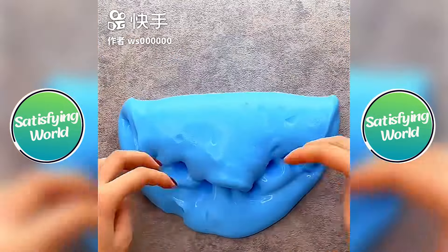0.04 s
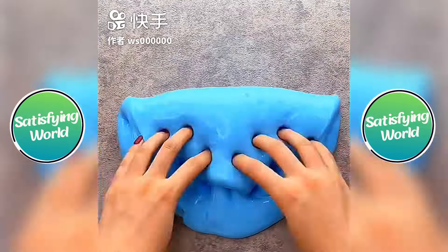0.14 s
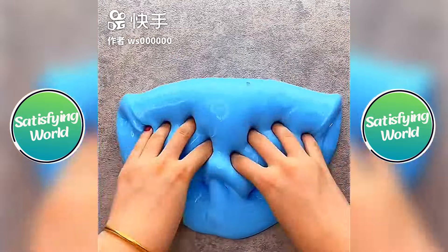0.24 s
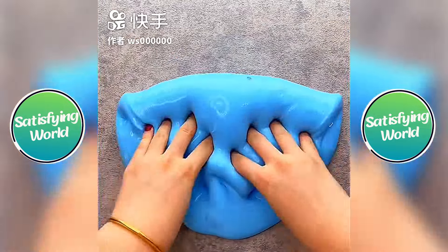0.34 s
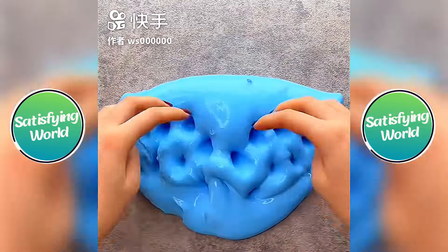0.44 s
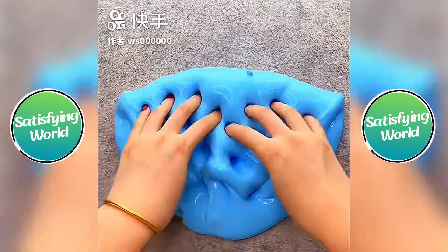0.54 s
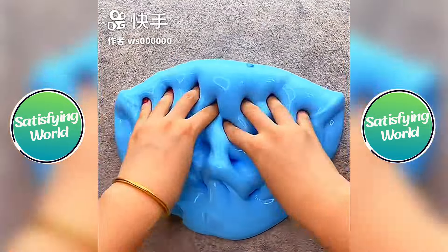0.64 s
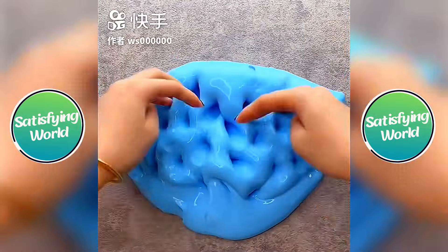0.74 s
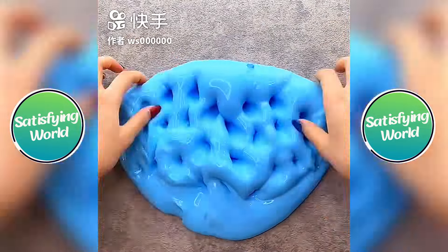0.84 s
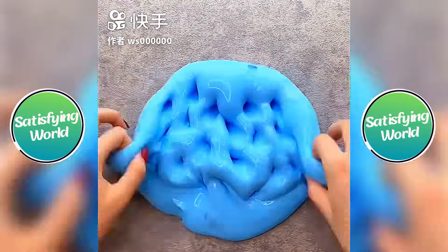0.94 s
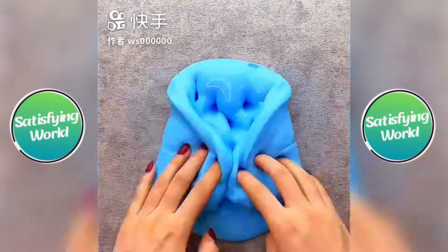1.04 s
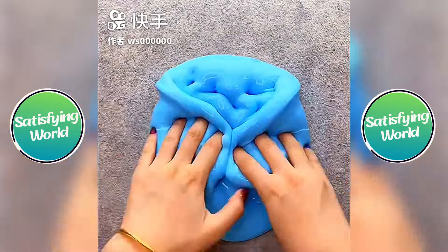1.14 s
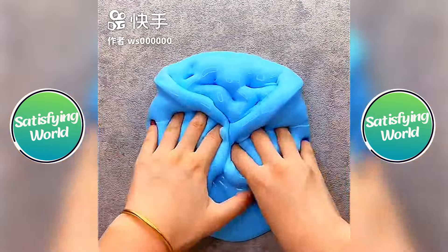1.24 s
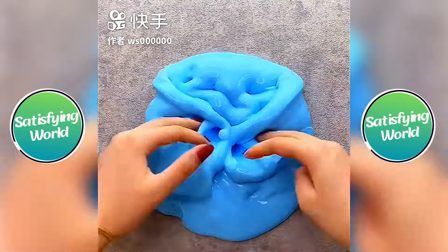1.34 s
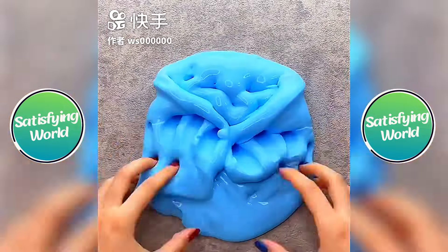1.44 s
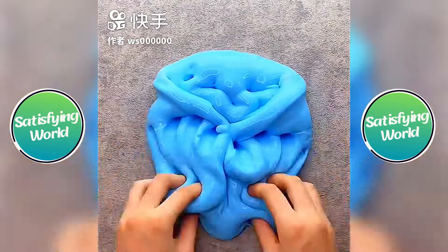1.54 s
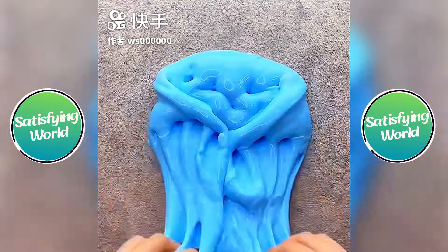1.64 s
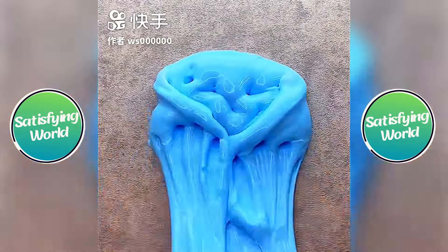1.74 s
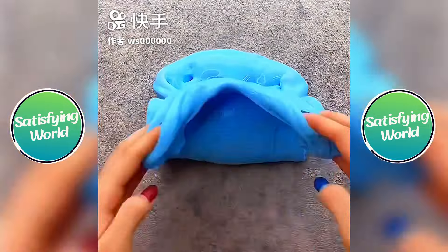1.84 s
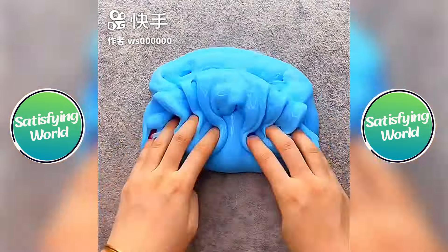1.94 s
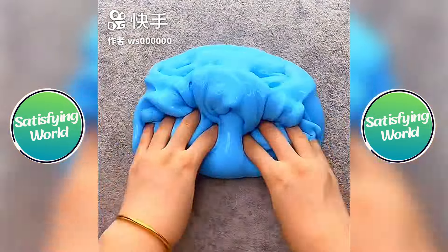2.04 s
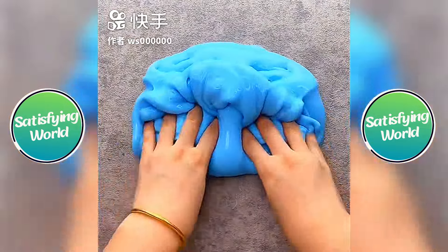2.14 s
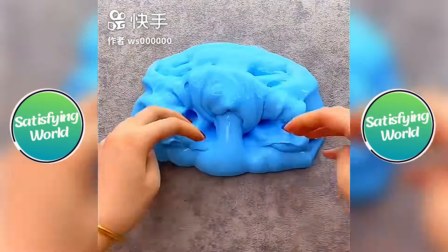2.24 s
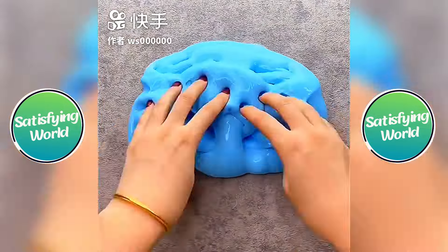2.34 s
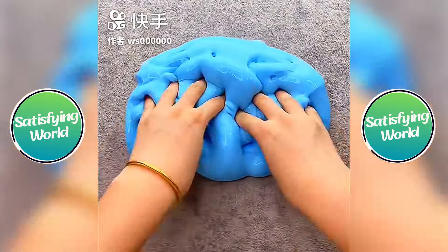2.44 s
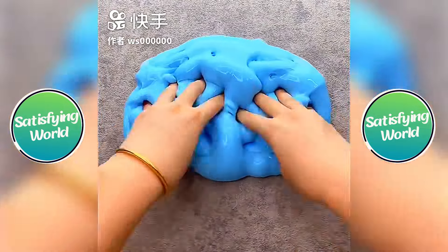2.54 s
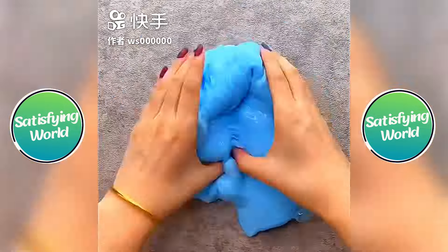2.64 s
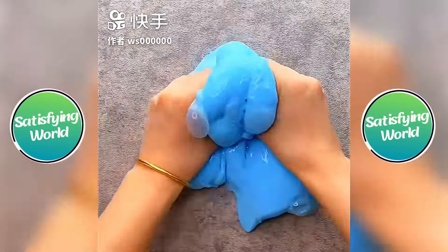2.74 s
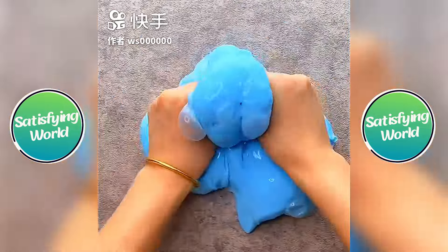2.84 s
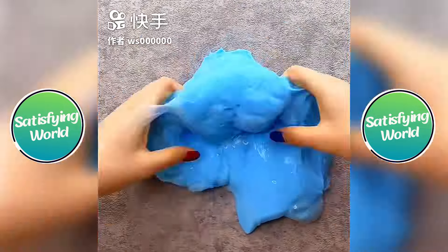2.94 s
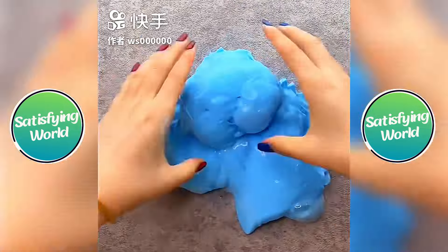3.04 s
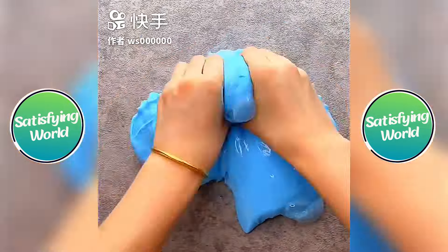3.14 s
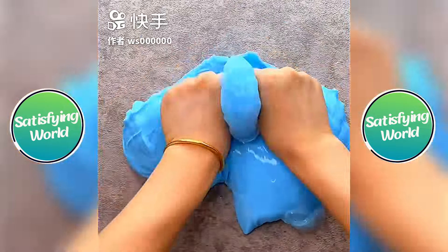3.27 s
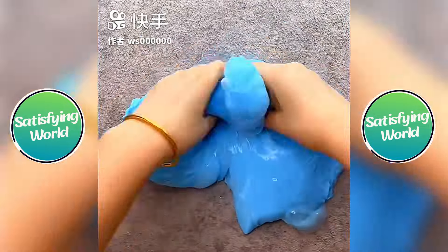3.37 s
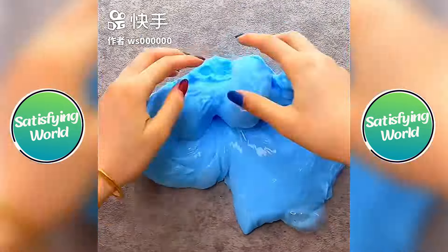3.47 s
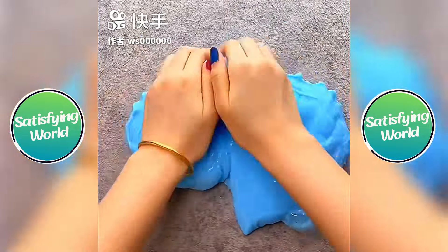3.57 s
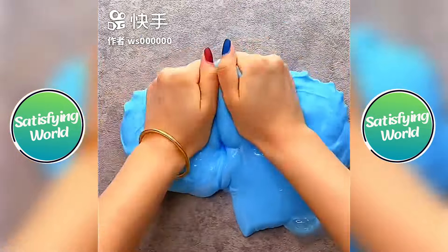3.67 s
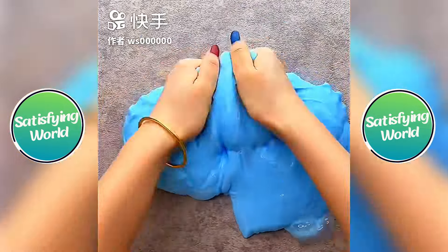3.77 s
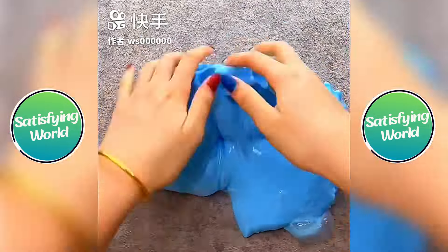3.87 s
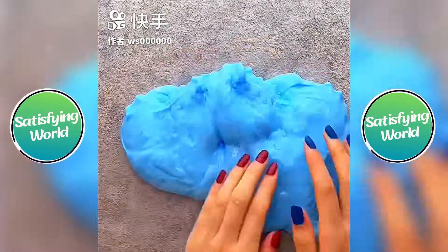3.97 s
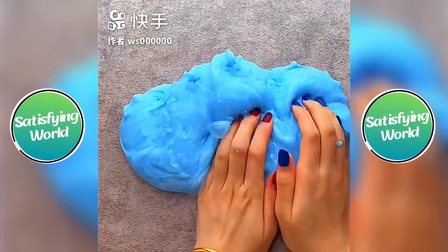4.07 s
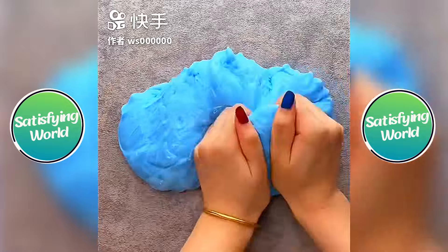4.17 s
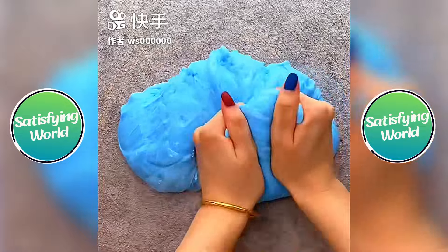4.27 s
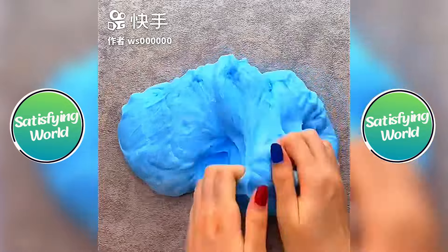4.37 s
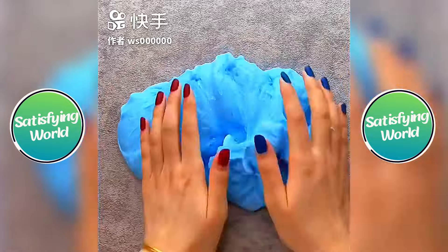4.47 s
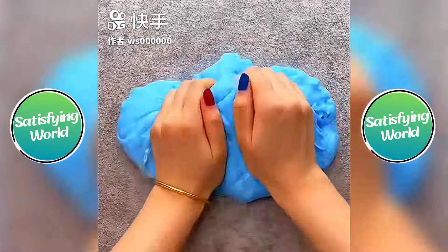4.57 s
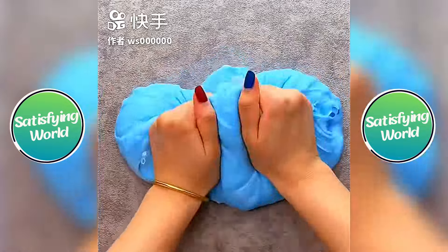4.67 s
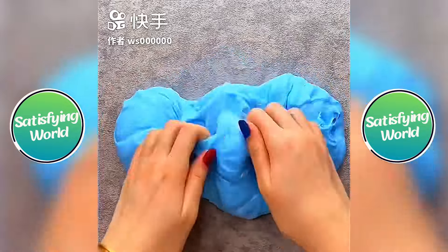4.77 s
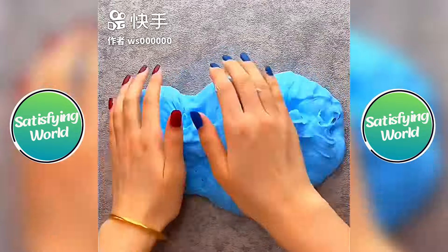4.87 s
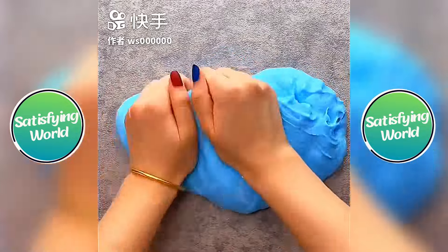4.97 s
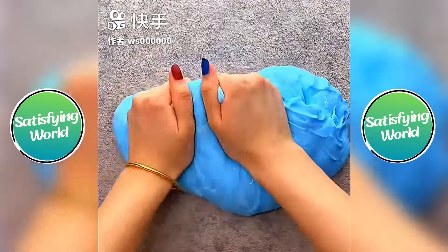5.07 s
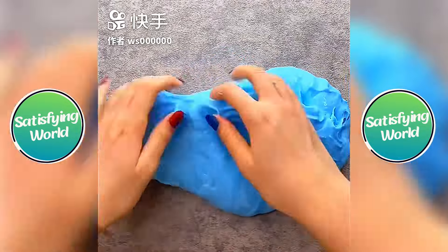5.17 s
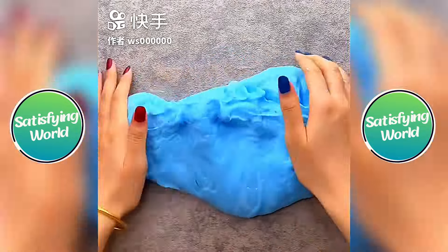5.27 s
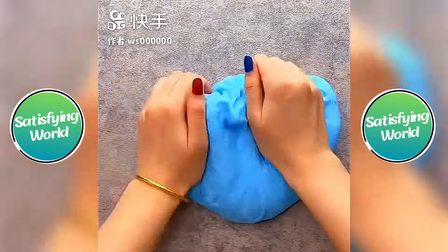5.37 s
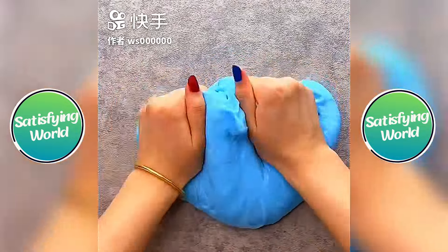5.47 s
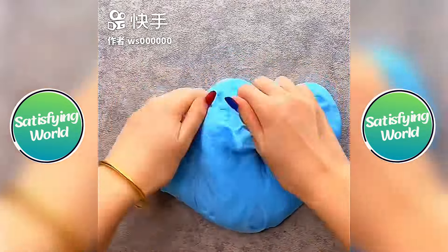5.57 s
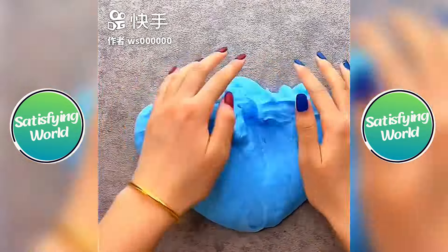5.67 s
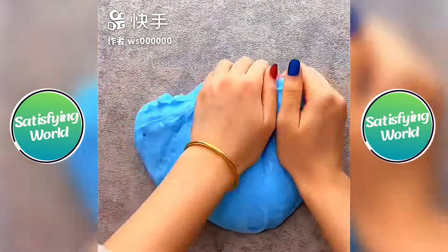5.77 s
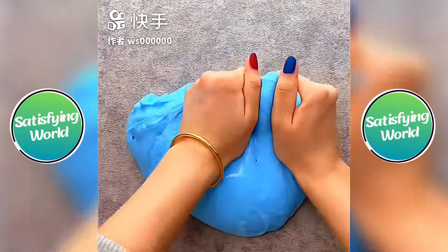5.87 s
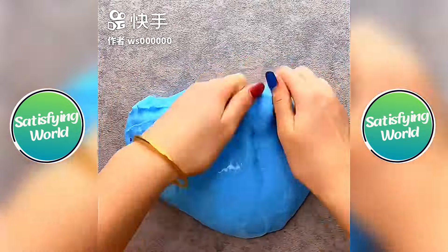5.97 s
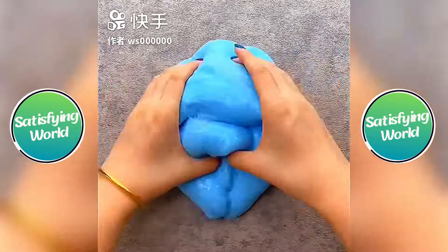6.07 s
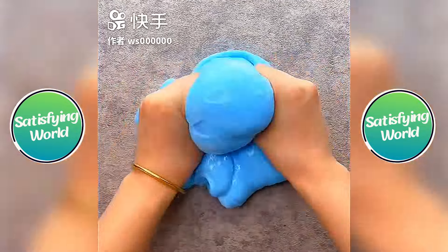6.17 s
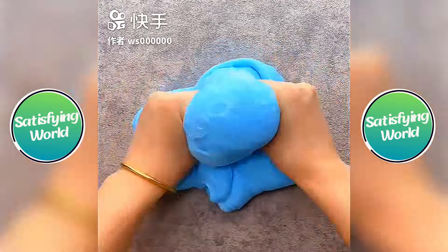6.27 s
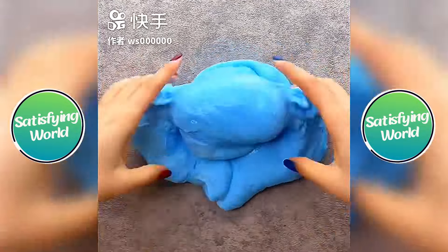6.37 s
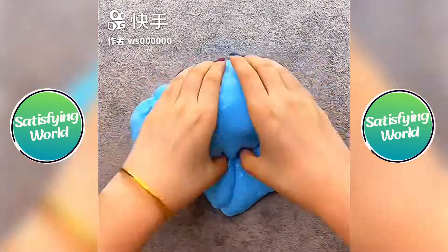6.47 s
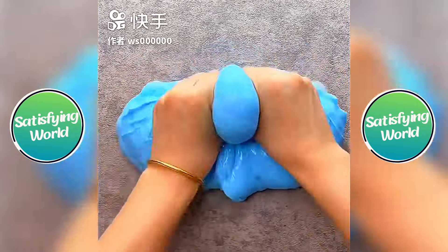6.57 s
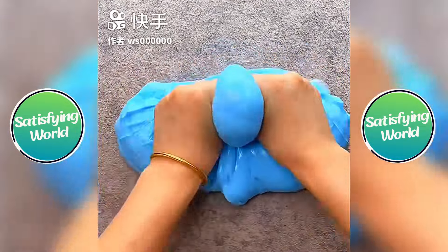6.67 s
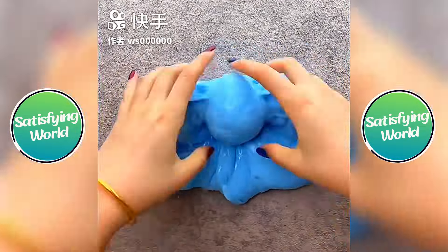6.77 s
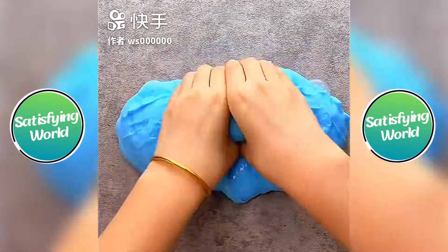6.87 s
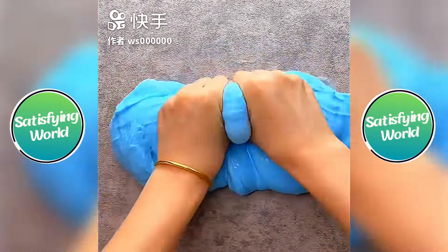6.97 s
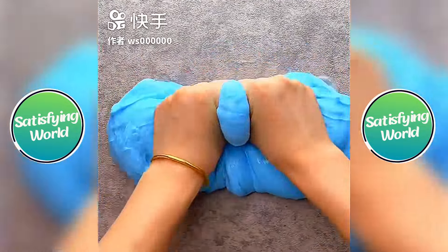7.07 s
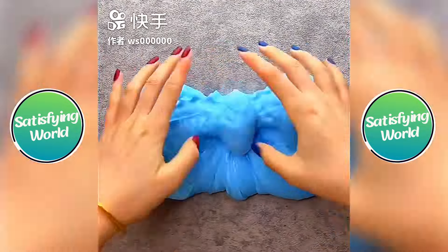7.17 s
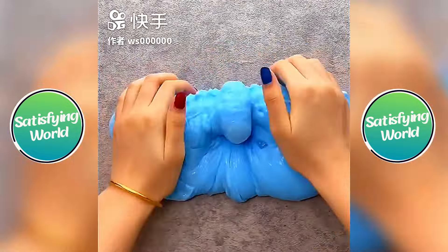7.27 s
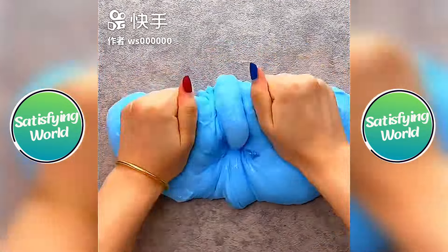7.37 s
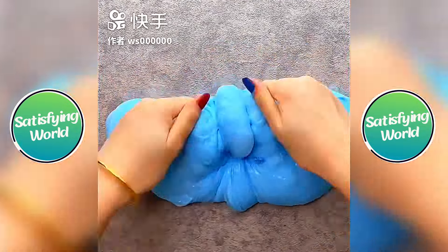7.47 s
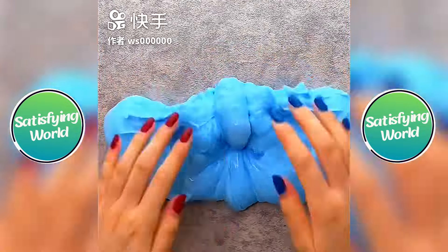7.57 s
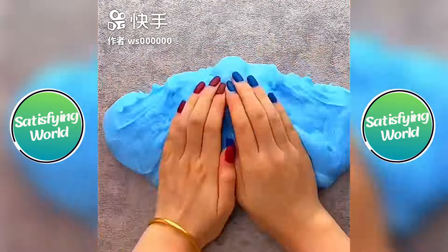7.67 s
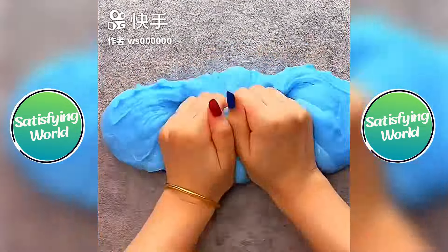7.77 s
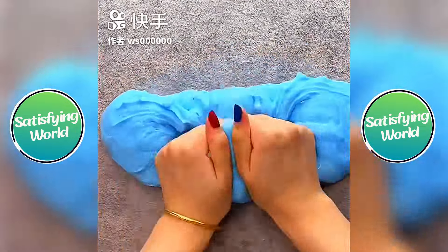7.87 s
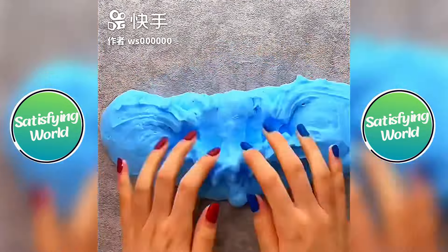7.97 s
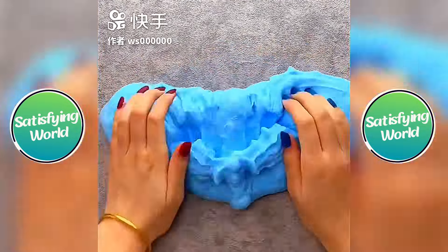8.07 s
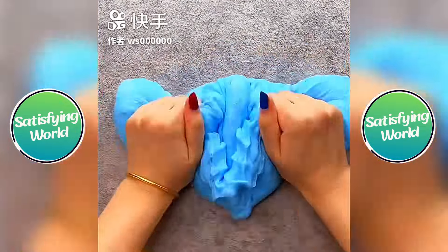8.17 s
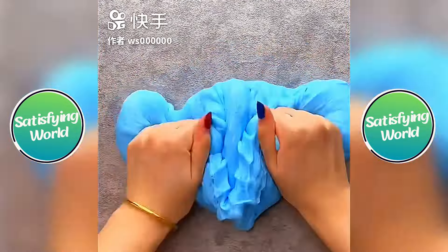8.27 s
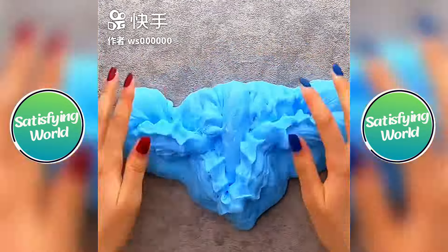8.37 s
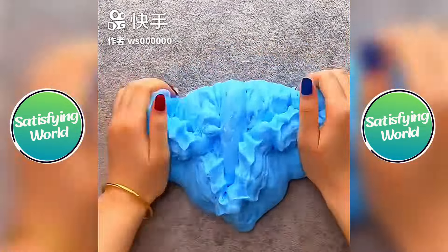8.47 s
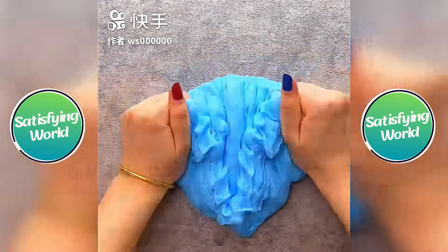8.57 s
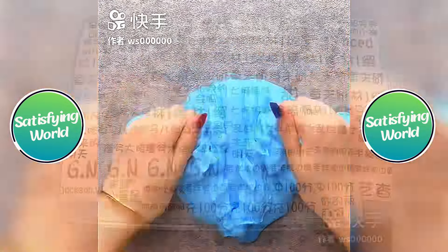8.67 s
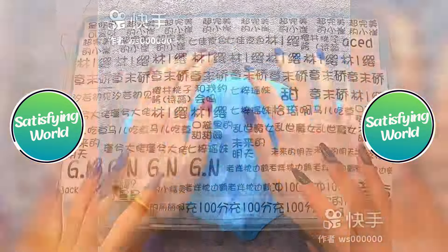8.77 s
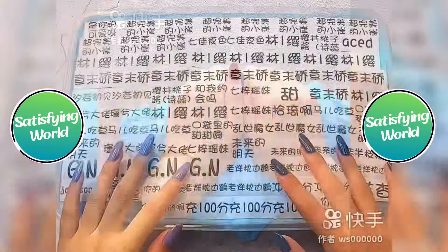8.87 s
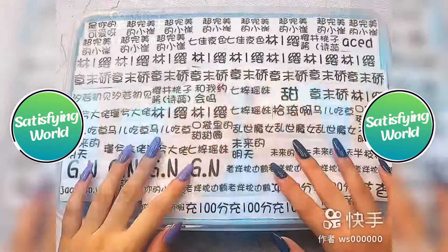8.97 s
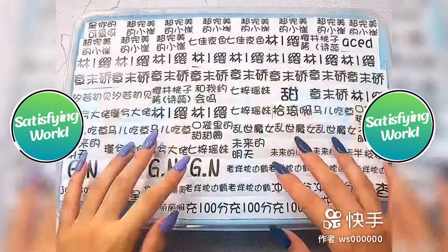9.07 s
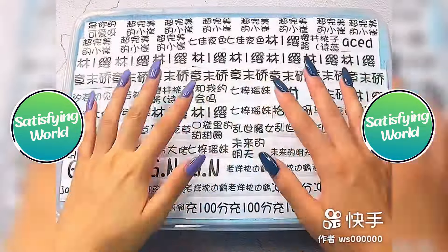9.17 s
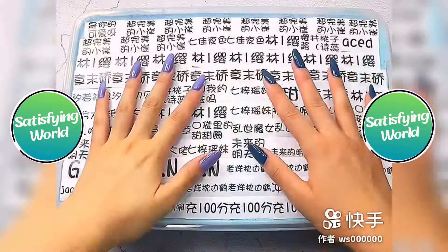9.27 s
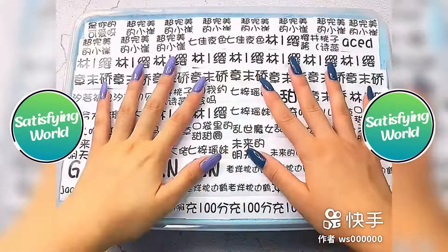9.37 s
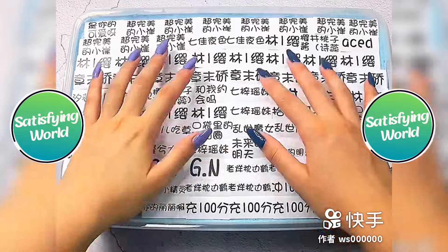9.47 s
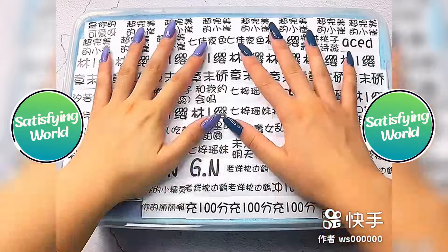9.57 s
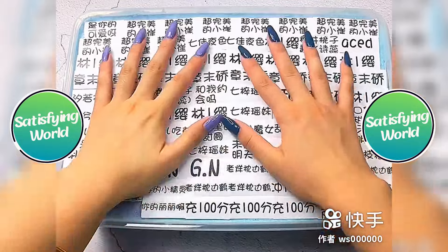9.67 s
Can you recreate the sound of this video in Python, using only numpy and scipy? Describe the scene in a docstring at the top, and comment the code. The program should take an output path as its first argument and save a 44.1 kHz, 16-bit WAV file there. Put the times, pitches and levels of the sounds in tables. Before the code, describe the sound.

Hands poke and knead thick wet slime, with hollow plops, sharp bubble pops and quick bursts of bright crackle ending in sticky peels and gurgles.

```python
"""Hands work a lump of thick slime on a table in a small room, over a faint low hush.
First fingertips poke it: pitched plops of trapped air, short spurts of bubbles, torn pops and a thin squeak.
Then sixteen squeezes follow: ringing bubbles burst in a bright crackle over a wet squish and a low squelch,
and after each one the fingers peel off with a sticky fizz while a sinking gurgle fills the hollow.
Near the end, around the last squeeze and landing, palms rub lightly over slime in a tub: shaped noise."""
import sys
import numpy as np
from scipy import signal
from scipy.fft import rfft, irfft
from scipy.io import wavfile
from scipy.ndimage import uniform_filter1d, minimum_filter1d

SR = 44100
rng = np.random.default_rng(int(sys.argv[2]) if len(sys.argv) > 2 else 0)


def to_wav(sig):
    """Store sig (one row per channel, or 1-D mono) as 16-bit WAV at the path in sys.argv[1].

    Samples outside -1..1 are clipped; the rate is SR.
    """
    pcm = np.clip(np.atleast_2d(sig), -1, 1) * 32767
    pcm = np.round(pcm).astype(np.int16)
    wavfile.write(sys.argv[1], SR, pcm.T)  # frames by channels


N = 428652
TIME = np.arange(N) / SR  # s

# Levels in the event tables are relative: each layer adds its own gain in dB.
# room hush colour: pitch_hz, level_db
HUSH_COLOUR = [(25, -22.5), (70, -25), (140, -3.5), (300, -15), (800, -22), (3000, -35), (16000, -41)]
# room tail, decay by pitch: pitch_hz, t60_s
ROOM_T60 = [(100, .3), (400, .21), (1000, .17), (2100, .17), (4000, .15), (14000, .13)]
# room tail, level by pitch: pitch_hz, level_db
ROOM_LEVELS = [(100, -8), (400, -13), (1000, -14), (2100, -12), (4000, -19.5), (14000, -15.5)]
# palms rubbing lightly over the slime in the tub: time_s, level_db
TUB_RUBS = [(8.72, -53.5), (8.98, -41.5), (9.2, -49), (9.26, -32.5), (9.32, -44), (9.4, -33.5),
            (9.56, -50.5), (9.71, -36.5)]
# colour of the rub: pitch_hz, level_db (per Hz)
RUB_COLOUR = [(50, -11), (160, 11), (400, 8), (1000, 2), (3000, -3.5), (7000, 0.5), (10000, 3.5),
              (16000, -11)]
# fingertips sinking in with a spurt of bubbles: start_s, length_s, level_db, lingering_ring_db
POKES = [(0.0, 0.0056, -26.5, -27), (0.357, 0.031, -21.5, -26.5), (0.71, 0.025, -19.5, -32.5),
         (0.831, 0.016, -34.5, -43.5), (1.013, 0.0028, -36, -42), (1.303, 0.047, -24, -31.5),
         (1.43, 0.035, -32, -43), (2.169, 0.05, -25.5, -34), (2.543, 0.029, -21, -61),
         (8.058, 0.024, -30, -53), (8.407, 0.026, -34, -47)]
# pitches that linger after a poke: pitch_hz, level_db
AFTER_RING_TONES = [(1610, 0.5), (1745, -1.5), (2030, 7.5), (2260, -3.5), (2370, -17.5), (2790, -4)]
# thin squeak of air through a pinhole: time_s, pitch_hz, level_db
SQUEAK_PATH = [(1.735, 1310, -62), (1.77, 1220, -49), (1.805, 1170, -54), (1.825, 1130, -62)]
# hands land and push out a pocket of air: start_s, level_db, pitch_hz, slap_db (relative to the plop)
PLOPS = [(0.002, -20.5, 242.2, -9), (0.361, -6, 375, -3), (0.388, -18, 243.7, -10),
         (0.712, -14.5, 382.2, 4), (0.736, -21, 241.5, -25), (0.829, -5.5, 459, -5),
         (0.847, -13.5, 241.2, -4.5), (0.967, -18, 242.3, -5.5), (1.018, -21, 253, 1),
         (1.308, -13.5, 181.2, -23), (1.43, -11.5, 244.3, -1), (2.177, -6, 201.7, -12),
         (2.198, -4.5, 247.4, -25), (2.544, -10.5, 377.4, -19), (2.565, -21, 234, 12.5),
         (2.681, -17.5, 411, -9), (3.524, -20.5, 433, -1.5), (3.539, -8.5, 227.7, -3),
         (3.841, -17.5, 230.6, -22), (3.975, -5.5, 566, 2), (4.003, -15.5, 535, 6), (4.498, -9, 235.7, -2),
         (5.724, -21, 234, -24), (6.094, -20, 240.5, -13), (6.484, -11.5, 660, 1.5),
         (7.217, -17, 188.2, -0.5), (7.61, -11, 585, 5.5), (8.041, -11, 249, 1.5), (8.412, -14, 244.6, 8.5),
         (8.799, -22, 381.4, -3.5), (9.153, -24.5, 378.5, 0.5)]
# hollow ring of the table under the slime: pitch_hz, level_db, t60_s
TABLE_MODES = [(99.4, -22, 0.26), (158.5, -16, 0.17), (195.3, -12.5, 0.17), (245, -6.5, 0.18),
               (369, -12, 0.15), (542, -13, 0.07), (588, -14.5, 0.099)]
# fingers gather the slime or draw it out: middle_s, half_length_s, squish_db
GRIPS = [(0.933, 0.046, -40), (1.6, 0.025, -39), (1.821, 0.083, -51), (1.993, 0.035, -54.5),
         (3.277, 0.017, -37.5), (4.049, 0.031, -32.5), (5.291, 0.023, -30.5), (5.731, 0.029, -34.5),
         (6.087, 0.029, -31.5), (7.243, 0.013, -28.5), (7.655, .028, -31.5)]
# fists close, then let go:
# start_s, end_s, crackle_db, squish_db, pause_s (until the fingers peel off), peel_db, gurgle_db
SQUEEZES = [(2.696, 2.815, -17, -22, 0.11, -26.5, -28), (3.134, 3.218, -20.5, -27, 0.14, -24.5, -27),
            (3.595, 3.698, -20.5, -23.5, 0.11, -31, -31.5), (4.115, 4.238, -18, -26.5, 0.1, -30, -25.5),
            (4.568, 4.65, -19.5, -26.5, 0.11, -33, -42.5), (4.932, 5.042, -20, -26.5, 0.087, -35.5, -32.5),
            (5.394, 5.453, -18.5, -31.5, 0.11, -34.5, -35), (5.78, 5.878, -21.5, -35.5, 0.05, -41.5, -46),
            (6.154, 6.212, -18, -26.5, 0.093, -25.5, -34), (6.481, 6.604, -18.5, -26, 0.11, -28.5, -30.5),
            (6.9, 7.005, -20, -25.5, 0.099, -33, -37), (7.32, 7.376, -22.5, -33, 0.091, -36.5, -42),
            (7.743, 7.818, -14.5, -24.5, 0.097, -36, -33.5),
            (8.131, 8.196, -24.5, -31, 0.094, -35.5, -33.5), (8.473, 8.555, -23.5, -33.5, 0.12, -39.5, -40),
            (8.864, 8.938, -21, -35, .111, -47, -45)]
# biggest bubbles, and those that burst alone: start_s, snap_db, body_db, body_pitch_hz
POPS = [(0.36, -4.5, -8, 3370), (0.383, -17, -22, 1490), (0.713, -11, -31, 663), (0.729, -12.5, -12, 2330),
        (1.303, -10, -18.5, 3060), (1.325, -13, -22, 3000), (1.775, -34, -42, 1210),
        (1.867, -20, -18, 2870), (2.173, -1.5, -14, 980), (2.196, -10, -14, 2040), (2.216, -11.5, -33, 700),
        (2.328, -35, -41.5, 3560), (2.546, -4.5, -16.5, 2760), (2.557, -12.5, -11.5, 1134),
        (2.681, -20.5, -11.5, 1980), (2.726, -3, -10.5, 2100), (2.838, -9.5, -23, 2040),
        (3.099, -43, -19, 3400), (3.151, -16.5, -15.5, 4550), (3.174, -12, -6.5, 2230),
        (3.209, -10, -29, 2600), (3.272, -19.5, -33, 2010), (3.326, -43, -13.5, 4300),
        (3.596, -27.5, -12, 2690), (3.639, -6, -9, 2200), (3.691, -2, -27, 794), (4.102, -6.5, -13, 3300),
        (4.126, -23, -25, 770), (4.176, -7.5, -10.5, 3170), (4.319, -22.5, -22.5, 2100),
        (4.613, -6, -9.5, 3760), (4.914, -16.5, -24, 4300), (4.948, -24, -17, 3900), (4.97, -3, -10, 3930),
        (5.389, -2, -13, 4040), (5.461, -16, -34, 3400), (5.819, -12, -15.5, 2570),
        (6.094, -18.5, -19, 1710), (6.168, 1, -20, 1010), (6.472, -12, -11, 970), (6.486, -1, 5, 4300),
        (6.528, 2, -5, 3360), (6.889, -11.5, -32, 2630), (6.908, -8, -1.5, 2280), (6.959, -1.5, -2, 3950),
        (7.308, -13, -34, 4270), (7.338, -2, -10, 4170), (7.703, -12, -23, 3320), (7.759, 3.5, -5, 4300),
        (8.13, -4.5, -21, 890), (8.139, -5, -28, 680), (8.198, -15.5, -22, 4550), (8.48, -18, -29, 4320),
        (8.546, -18.5, -20.5, 2800)]
# colours of the fine, wet, low and gurgling bubbles: pitch_hz, level_db (per Hz)
CRACKLE_COLOUR = [(1500, -11), (3000, -2), (4500, 1), (8000, 3), (10000, -1.5), (12500, 8), (16000, 5)]
SQUISH_COLOUR = [(300, -20), (700, -4), (1500, -6.5), (2600, 0.5), (4000, -10), (7000, -6)]
SQUELCH_COLOUR = [(30, -20.5), (70, -14.5), (110, -14.5), (240, -0.5), (310, -4), (560, -5.5), (900, -20),
                  (2000, -25)]
GURGLE_COLOUR = [(40, -22.5), (85, -6), (160, 0.5), (240, 1), (320, -8), (560, -12.5), (900, -21),
                 (2000, -26)]

SQUELCH_BELOW_SQUISH_DB = 7.5
# chance pops in a squeeze; snap relative to its crackle, body to its squish, each spread either way
POPS_PER_S, POP_SNAP_DB, POP_BODY_DB, POP_SPREAD_DB = 34, 4.5, -2, 1
POP_LOW_HZ, POP_HIGH_HZ = 1570, 4670
# gulps of air as the fists close (relative to the squish) and as the fingers start to lift (to the gurgle)
CLOSING_GULP_DB, LIFTING_GULP_DB, LIFTING_LEAD_S = 4.5, 6.0, 0.016
GULP_HZ, GULP_SLAP_DB = 248.5, -13.5
# fizz and squish relative to the peel
PEEL_HALF_S, PEEL_FIZZ_DB, PEEL_SQUISH_DB = 0.024, 2.5, -2
# fizz relative to the grip's squish; the gurgle is an offset plus a share of the squish's dB
GRIP_FIZZ_DB, GRIP_GURGLE_DB, GRIP_GURGLE_SHARE = -7, -17, 0.56
CUTOFF_HZ = 16000


def from_db(db):
    """Decibels to gain."""
    return 10 ** (np.asarray(db) / 20)


def rms_one(x):
    """Scale to unit power."""
    return x / np.sqrt(np.mean(x ** 2) + 1e-20)


def at_hz(points, hz):
    """Read a table on a log-frequency axis."""
    table_hz, values = np.transpose(points)
    return np.interp(np.log(np.maximum(hz, 1)), np.log(table_hz), values)


def colour(x, spectrum, size=4096):
    """Causal (minimum-phase) filter with the given spectrum, made by folding its cepstrum."""
    gains = from_db(at_hz(spectrum, np.fft.rfftfreq(size, 1 / SR)))
    cepstrum = irfft(np.log(gains))
    cepstrum[1:size // 2] *= 2
    cepstrum[size // 2 + 1:] = 0
    impulse = irfft(np.exp(rfft(cepstrum)))
    return signal.oaconvolve(x, impulse[None], axes=1)[:, :N]


def ring(clicks, hz, t60):
    """A resonator: a unit click starts a decaying sine that falls 60 dB in t60 seconds."""
    r = from_db(-60 / (t60 * SR))
    w = 2 * np.pi * hz / SR
    return signal.lfilter([0, np.sin(w)], [1, -2 * r * np.cos(w), r * r], clicks + 1e-18)


def add(out, s, sound, pan_db=0):
    """Mix a sound in at a time and a place between left and right."""
    i = max(round(s * SR), 0)
    sides = from_db([[pan_db / 2], [-pan_db / 2]])
    out[:, i:i + sound.shape[-1]] += sides * sound[..., :N - i]


def drift(rate):
    """A random wander with a spread of about 1, heading for a new value rate times a second (at most 400)."""
    knots = rng.standard_normal(4000)
    return 1.2 * np.interp(TIME * min(rate, 400), np.arange(len(knots)), knots)


def stereo_noise(size, width):
    """Noise that is partly alike on both sides."""
    mid, side = rng.standard_normal((2, size))
    return (mid + width * side * [[1], [-1]]) / np.sqrt(1 + width ** 2)


def push(start, end, rise_s, fade_s):
    """Pressure of a hand: builds ahead of the start, holds, lets go after the end."""
    before = np.maximum(start - TIME, 0) / rise_s
    after = np.maximum(TIME - end, 0) / fade_s
    return np.exp(-np.minimum(before ** 2 + after, 30))


def bubbles(per_s, low_hz, high_hz, cycles, spread_db, spectrum, even_s, tear_s, patchy_db, width,
            count=16, size=4):
    """Unequal bubbles burst at random in a few quick tears, ring for some cycles (to -60 dB), flow evenly."""
    born = np.flatnonzero(rng.random(N) < per_s / SR)
    strengths = from_db(spread_db * np.minimum(rng.exponential(1, len(born)), 4))
    log_pitch = rng.uniform(np.log(low_hz), np.log(high_hz), len(born))
    delays = (tear_s * SR * rng.exponential(1, (size, len(born)))).astype(int)
    tears = np.minimum(born + delays, N - 1)
    out = np.zeros((2, N))
    for hz in np.geomspace(low_hz, min(high_hz, .42 * SR), count):
        # each bubble rings around its own pitch, and the prevailing bubble size keeps shifting
        closeness = 1 / (1 + ((np.log(hz) - log_pitch) / 0.19) ** 2)
        strength = strengths * closeness * from_db(patchy_db * drift(70)[born])
        clicks = np.zeros((2, N))
        for at in tears:
            clicks[:, at] += strength * stereo_noise(len(at), width)
        out += np.sqrt(hz) * ring(clicks, hz, cycles / hz)
    out = colour(out, spectrum)
    # divide by the running level to keep the average flow even
    window = int(even_s * SR)
    power = uniform_filter1d(uniform_filter1d(np.mean(out ** 2, axis=0), window), window)
    return out / np.sqrt(np.abs(power) + 1e-4 * np.mean(power))


def hush(level_db=-57, width=0.17):
    """Faint low rumble of the room: steady coloured noise."""
    return from_db(level_db) * rms_one(colour(stereo_noise(N, width), HUSH_COLOUR))


def room(x, near_db=-10, near_s=0.0047, near_hz=1500, width=0.4, count=12):
    """Quick bright reflections off hands and table, then a short tail that decays band by band."""
    t = TIME[:SR // 2]
    near = stereo_noise(len(t), 0.061) * np.exp(-t / near_s) * (t > .001)
    near = signal.sosfilt(signal.butter(2, near_hz, "high", fs=SR, output="sos"), near)
    echo = from_db(near_db) * rms_one(near) / np.sqrt(len(t))
    edges = np.geomspace(60, 17000, count + 1)
    for low, high in zip(edges, edges[1:]):
        hz = np.sqrt(low * high)
        fade = np.exp(-t * np.log(1000) / at_hz(ROOM_T60, hz)) * (1 - np.exp(-t / 0.011))
        band_filter = signal.butter(2, [low, high], "band", fs=SR, output="sos")
        band = signal.sosfilt(band_filter, stereo_noise(len(t), width))
        echo += from_db(at_hz(ROOM_LEVELS, hz)) * band * fade / np.linalg.norm(fade)
    return x + signal.oaconvolve(x, echo, axes=1)[:, :N]


def side_echo(x, level_db=-9, fade_s=0.012, low_hz=4000, high_hz=8200):
    """Treble that glances off the hands arrives with opposite sign left and right, widening the crackle."""
    t = TIME[:SR // 30]
    band = signal.butter(2, [low_hz, high_hz], "band", fs=SR, output="sos")
    glance = rms_one(rng.standard_normal(len(t)) * np.exp(-t / fade_s)) / np.sqrt(len(t))
    echoed = signal.oaconvolve(x.mean(axis=0), glance)[:N]
    return from_db(level_db) * signal.sosfilt(band, echoed) * [[1], [-1]]


def rubbing(level_db=-1, grain_db=2.5, width=0.13):
    """Skin slides over the smooth slime in the tub: a fine hiss with a slight flickering grain."""
    s, db = np.transpose(TUB_RUBS)
    level = np.interp(TIME, s, db, left=-np.inf) + level_db + grain_db * drift(120)
    return from_db(level) * rms_one(colour(stereo_noise(N, width), RUB_COLOUR))


def after_ring(fade_s=0.056, waver_db=3):
    """A faint airy ring near 2 kHz, noise through resonators, lingers unevenly after each poke."""
    level = sum(from_db(db) * push(s, s + length, rise_s=0.0017, fade_s=fade_s) for s, length, _, db in POKES)
    air = stereo_noise(N, 1.0)
    tones = sum(from_db(db + waver_db * drift(25)) * ring(air, hz, .022) for hz, db in AFTER_RING_TONES)
    return level * rms_one(tones)


def squeak():
    """The pinhole's whistle, a gliding sine, sinks as the pressure drops."""
    s, hz, db = np.transpose(SQUEAK_PATH)
    level = from_db(np.interp(TIME, s, db, left=-np.inf, right=-np.inf))
    phase = 2 * np.pi * np.cumsum(np.interp(TIME, s, hz)) / SR
    return level * np.sin(phase)


def skin_smacks(level_db=-24, fade_s=0.0076, low_hz=3500, width=0.21):
    """As a hand lands, its skin sticks to the wet surface with a faint bright smack of noise."""
    out, t = np.zeros((2, N)), TIME[:SR // 10]
    bright = signal.butter(2, low_hz, "high", fs=SR, output="sos")
    for s, db, _, _ in PLOPS:
        smack = signal.sosfilt(bright, stereo_noise(len(t), width) * np.exp(-t / fade_s))
        add(out, s, from_db(db + level_db) * smack)
    return out


def peels():
    """Squeezes end in a peel, grips make one too: rows of middle_s, half_length_s, fizz_db, squish_db, gurgle_db."""
    rows = []
    for _, end, _, _, pause, db, gurgle in SQUEEZES:
        rows.append((end + pause, PEEL_HALF_S, db + PEEL_FIZZ_DB, db + PEEL_SQUISH_DB, gurgle))
    for s, half, db in GRIPS:
        rows.append((s, half, db + GRIP_FIZZ_DB, db, GRIP_GURGLE_DB + GRIP_GURGLE_SHARE * db))
    return rows


def gurgles(level_db=-3, start_hz=290, end_hz=170, lag_s=0.0217, length_s=0.026, wobble=0.19, rough=0.33):
    """The hollow left by the fingers widens, so its soft wavering note sinks."""
    out = np.zeros((2, N))
    t = TIME[:SR // 5] - .1  # s from the middle of the note
    waver, flutter = drift(90), drift(130)
    opened = .5 + .5 * np.tanh(t / length_s)
    for middle, _, _, _, db in peels():
        first = min(int(middle * SR), N - len(t))
        here = slice(first, first + len(t))
        hz = (start_hz + (end_hz - start_hz) * opened) * (1 + wobble * (waver[here] + rng.normal()))
        note = np.sin(2 * np.pi * np.cumsum(hz) / SR) * (1 + rough * flutter[here])
        add(out, middle + lag_s + t[0], from_db(db + level_db) * note * np.exp(-(t / length_s) ** 2))
    return out


def peeling(fizz_db=1, squish_db=-1.0, gurgle_db=-2, gurgle_stretch=1.35, skirt=2.3):
    """Skin leaves the slime in a swell of tiny tears while air gurgles into the hollow."""
    swell = np.zeros((3, N))  # fizz, squish, gurgle
    for middle, half, *levels in peels():
        near = np.abs(TIME - middle) < 5 * half
        away = np.abs(TIME[near] - middle) / (half * np.array([[1], [1], [gurgle_stretch]]))
        swell[:, near] += from_db(levels)[:, None] * np.exp(-.5 * away ** skirt)
    fine = bubbles(3500, 2820, 14300, cycles=14, spread_db=4.5, spectrum=CRACKLE_COLOUR, even_s=0.012,
                   tear_s=0.00048, patchy_db=8, width=0.043, count=12)
    wet = bubbles(750, 458, 5560, cycles=25, spread_db=-2.0, spectrum=SQUISH_COLOUR, even_s=0.075,
                  tear_s=.001, patchy_db=6.5, width=0.49, count=20)
    low = bubbles(220, 81, 860, cycles=10.0, spread_db=1.5, spectrum=GURGLE_COLOUR, even_s=0.034,
                  tear_s=.002, patchy_db=3.5, width=0.15, count=14)
    return (from_db(fizz_db) * fine * swell[0]
            + from_db(squish_db) * wet * swell[1]
            + from_db(gurgle_db) * low * swell[2])


def gulps():
    """A little air moves as each squeeze starts and as it lets go: rows as in PLOPS."""
    rows = []
    for start, end, _, squish, pause, _, gurgle in SQUEEZES:
        rows.append((start, squish + CLOSING_GULP_DB, GULP_HZ, GULP_SLAP_DB))
        rows.append((end + pause - LIFTING_LEAD_S, gurgle + LIFTING_GULP_DB, GULP_HZ, GULP_SLAP_DB))
    return rows


def cavity_ring(t, low_hz, high_hz, ring_s, count=4):
    """An air pocket of chance shape rings with a few pitches of its own."""
    hz = np.geomspace(low_hz, high_hz, count) * np.exp(rng.normal(0, 0.089, count))
    tones = np.sin(2 * np.pi * np.outer(t, hz)) @ rng.choice([-1, 1], count)
    return tones * np.exp(-t / ring_s) / np.sqrt(count)


def plops(air_db=-1, slap_db=-6, pocket_db=-8, flutter_db=-9, table_db=0, glide=2.671, glide_s=0.002015,
          air_s=0.014, slap_s=0.0082, flutter_s=0.017, dull_hz=3900, table_db_per_octave=-2.5, uneven_db=2.0):
    """Air leaks, then the pocket opens: pitch falls at once, wet lips slap and flutter, the table is pushed."""
    air, pushes = np.zeros((2, N)), np.zeros((2, N))
    since = TIME[:SR // 5] - .02  # s since the pocket opens
    t = np.maximum(since, 0)
    opening = 1 - np.exp(-(t / .0014) ** 2)
    leak = from_db(-21) * np.exp(-np.abs(since) / .003)
    slap_band = signal.butter(2, [750, 3200], "band", fs=SR, output="sos")
    flutter_band = signal.butter(2, [300, 750], "band", fs=SR, output="sos")
    for s, db, hz, slap_rel_db in PLOPS + gulps():
        phase = 2 * np.pi * np.cumsum(hz * (1 + glide * np.exp(-t / glide_s))) / SR
        gulp = from_db(air_db) * np.sin(phase) * np.exp(-t / air_s)
        lips = rms_one(signal.sosfilt(slap_band, stereo_noise(len(t), 0.54)))
        folds = rms_one(signal.sosfilt(flutter_band, stereo_noise(len(t), .33)))
        pocket = cavity_ring(t, 900, 2500, ring_s=.008)
        slap = from_db(slap_db) * lips * np.exp(-t / slap_s) + from_db(pocket_db) * pocket
        flutter = from_db(flutter_db) * folds * np.exp(-t / flutter_s)
        burst = gulp + from_db(slap_rel_db) * slap + flutter
        leaking = leak * (folds + from_db(slap_rel_db) * lips)
        add(air, s - .021, from_db(db) * (opening * burst + leaking))
        # small, high pockets push the table less
        push_db = db + table_db + table_db_per_octave * np.log2(hz / GULP_HZ)
        add(pushes, s + 0.004145, from_db([push_db]))
    # the hands land in ever new places, so each push favours other modes
    table = np.zeros(N)
    for k, (hz, db, t60) in enumerate(TABLE_MODES):
        table += (-1) ** k * ring(pushes[0] * from_db(db + uneven_db * drift(10)), hz, t60)
    # the soft slime muffles the top
    return signal.sosfilt(signal.butter(8, dull_hz, fs=SR, output="sos"), air + table)


def chance_pops(count=8):
    """Larger bubbles give way one after another while a squeeze lasts: rows as in POPS."""
    rows = []
    for start, end, crackle, squish, *_ in SQUEEZES:
        for k, (when, pitch, size, cavity) in enumerate(rng.random((count, 4))):
            s = start + (k + when) / POPS_PER_S
            snap = crackle + POP_SNAP_DB + POP_SPREAD_DB * (2 * size - 1)
            body = squish + POP_BODY_DB + POP_SPREAD_DB * (2 * cavity - 1)
            if s < end:
                rows.append((s, snap, body, POP_LOW_HZ * (POP_HIGH_HZ / POP_LOW_HZ) ** pitch))
    return rows


def pops(snap_db=8, body_db=4, tear_s=0.0016, rise_s=.0005, rasp=0.57, formant=0.66, width=0.057, pan_db=2):
    """The film of a larger bubble tears with a snap of its own colour, and its cavity rings briefly."""
    snaps, bodies, t = np.zeros((2, N)), np.zeros((2, N)), TIME[:SR // 40]
    wet_band = signal.butter(2, [600, 4200], "band", fs=SR, output="sos")
    opening = 1 - np.exp(-t / rise_s)
    for s, snap, body, hz in POPS + chance_pops():
        tear, splash = stereo_noise(len(t), width), stereo_noise(len(t), width)
        place, film_hz = rng.normal(0, pan_db), rng.uniform(4000, 14000)
        film = signal.lfilter(*signal.iirpeak(film_hz, 4, fs=SR), tear)
        tear = rms_one(tear + formant * rms_one(film)) * np.exp(-t / tear_s)
        cavity = np.sin(2 * np.pi * hz * t) * np.exp(-t * hz / 4.5)
        splash = rasp * rms_one(signal.sosfilt(wet_band, splash)) * np.exp(-t / (2 * tear_s))
        add(snaps, s - rise_s, from_db(snap + snap_db) * opening * tear, place)
        add(bodies, s - rise_s, from_db(body + body_db) * opening * (cavity + splash), place)
    return colour(snaps, CRACKLE_COLOUR) + bodies


def kneading(crackle_db=-3.0, squish_db=-1, squelch_db=-2, poke_squish_db=-3, poke_squelch_db=-5):
    """Pressure bursts bubbles of three sizes, in long squeezes and in short pokes."""
    flow = np.zeros((3, N))  # crackle, squish, squelch
    for start, end, crackle, squish, *_ in SQUEEZES:
        levels = from_db([crackle, squish, squish - SQUELCH_BELOW_SQUISH_DB])
        flow += np.outer(levels, push(start, end, rise_s=0.017, fade_s=0.016))
    spurt = sum(from_db(db) * push(s, s + length, rise_s=0.0048, fade_s=0.0068) for s, length, db, _ in POKES)
    fine = bubbles(2600, 2500, 16000, cycles=12, spread_db=3.8, spectrum=CRACKLE_COLOUR, even_s=.018,
                   tear_s=.0008, patchy_db=3, width=.3, count=22)
    wet = bubbles(700, 480, 5000, cycles=9.2, spread_db=3.5, spectrum=SQUISH_COLOUR, even_s=0.041,
                  tear_s=.0007, patchy_db=7.0, width=0.65, count=26)
    low = bubbles(300, 97, 900, cycles=6.6, spread_db=0.5, spectrum=SQUELCH_COLOUR, even_s=0.0042,
                  tear_s=.002, patchy_db=1, width=0.39, count=8)
    return (fine * (from_db(crackle_db) * flow[0] + spurt)
            + wet * (from_db(squish_db) * flow[1] + from_db(poke_squish_db) * spurt)
            + low * (from_db(squelch_db) * flow[2] + from_db(poke_squelch_db) * spurt))


def scene():
    """Slime in the room, over its hush."""
    slime = squeak() + skin_smacks() + gurgles() + peeling() + plops() + pops() + kneading()
    return hush() + rubbing() + after_ring() + side_echo(slime) + room(slime)


def record(dry, port_hz=9500, port_width_hz=3200, ceiling=0.95, hold_s=0.00033):
    """The right side turns in phase around one treble resonance; a fast limiter acts, then the top is cut."""
    r = np.exp(-np.pi * port_width_hz / SR)
    poles = np.array([1, -2 * r * np.cos(2 * np.pi * port_hz / SR), r * r])
    # reversed poles as zeros make an all-pass: phase turns, level stays
    ports = np.array([dry[0], signal.lfilter(poles[::-1], poles, dry[1])])
    allowed = np.minimum(1, ceiling / (np.abs(ports).max(axis=0) + 1e-9))
    hold = int(hold_s * SR)
    gain = uniform_filter1d(minimum_filter1d(allowed, hold), hold)
    top_cut = signal.ellip(10, .2, 70, CUTOFF_HZ, fs=SR, output="sos")
    return signal.sosfilt(top_cut, gain * ports)


dry = scene()
out = record(dry)
to_wav(out)
```